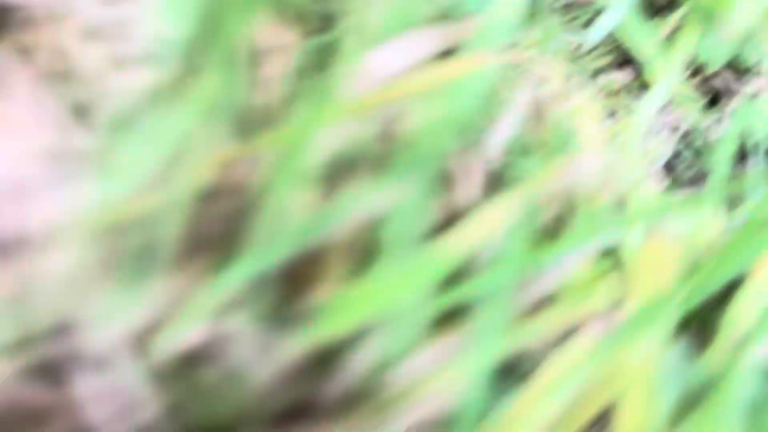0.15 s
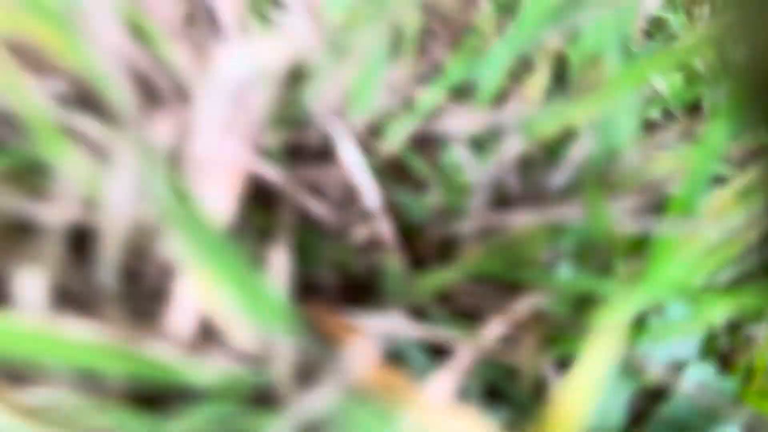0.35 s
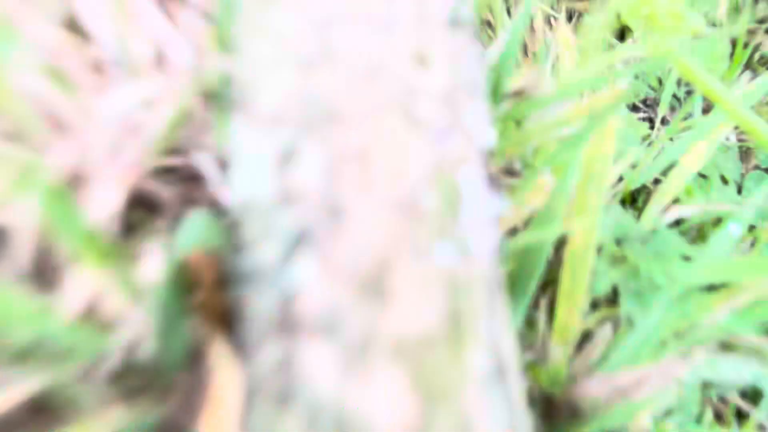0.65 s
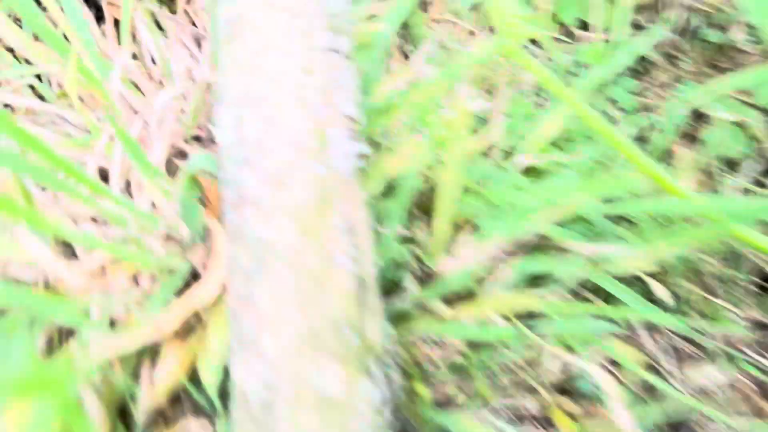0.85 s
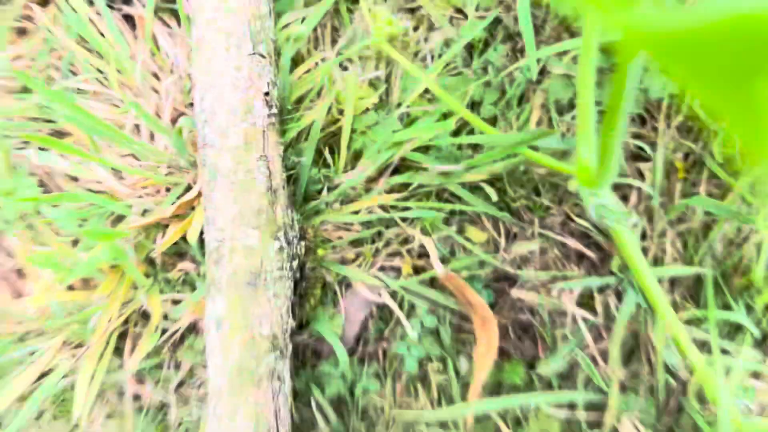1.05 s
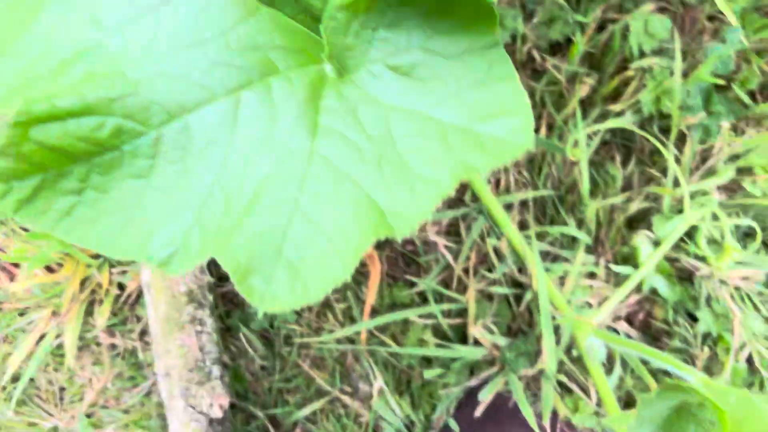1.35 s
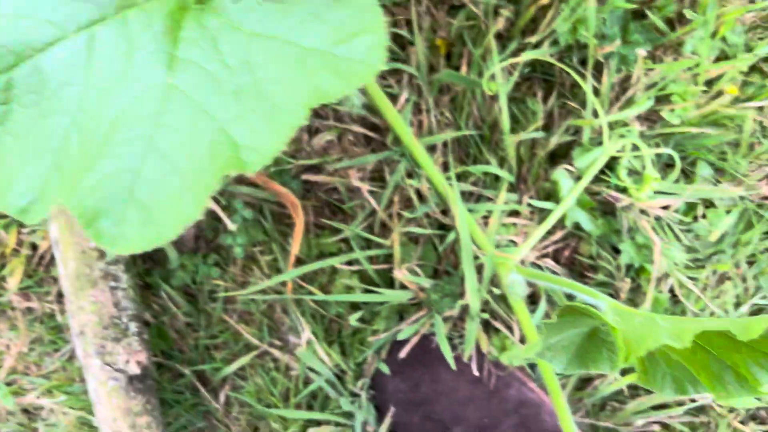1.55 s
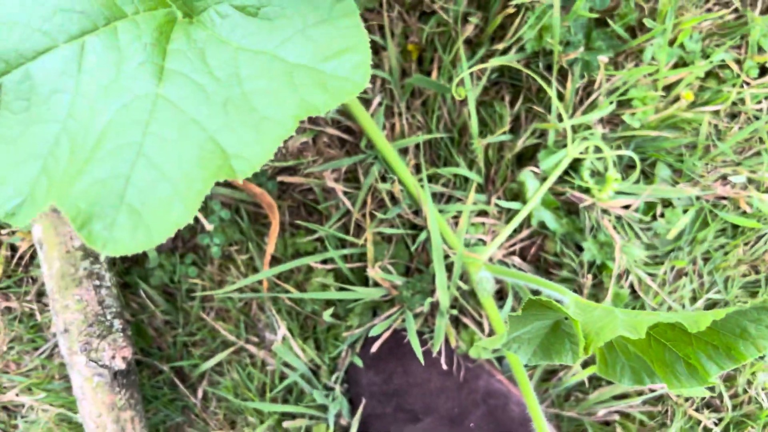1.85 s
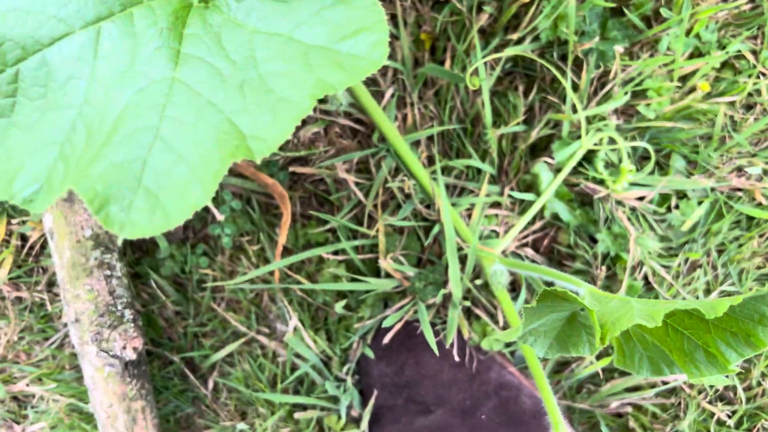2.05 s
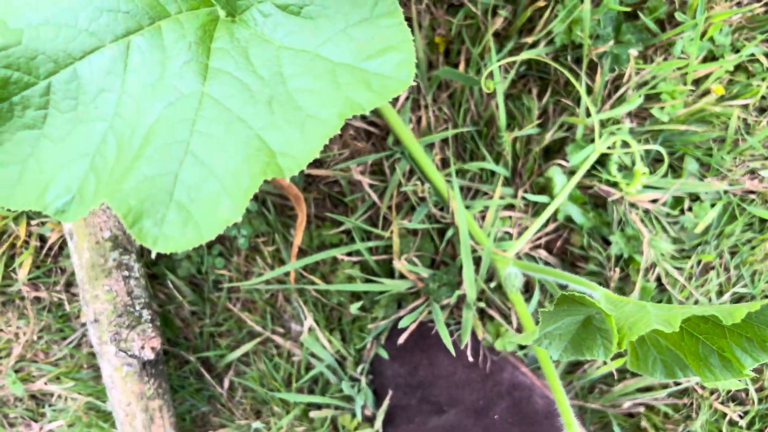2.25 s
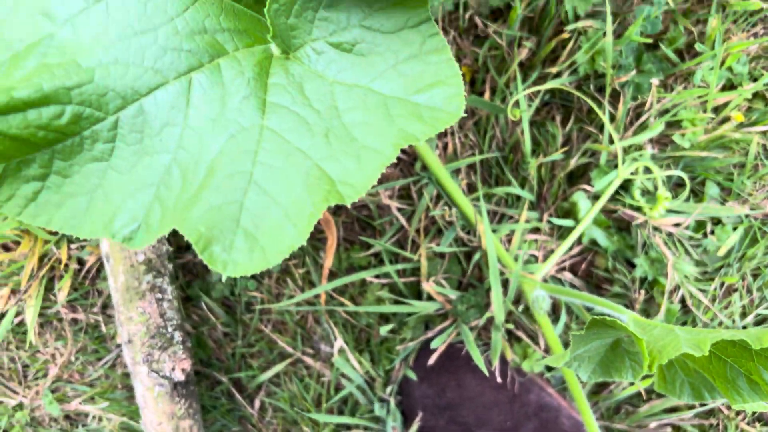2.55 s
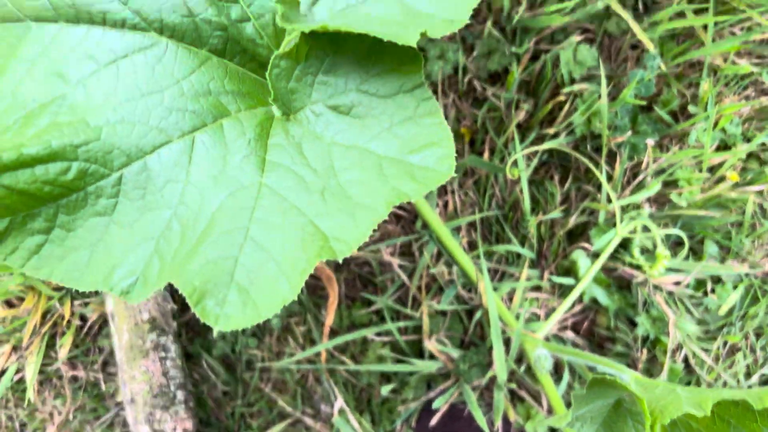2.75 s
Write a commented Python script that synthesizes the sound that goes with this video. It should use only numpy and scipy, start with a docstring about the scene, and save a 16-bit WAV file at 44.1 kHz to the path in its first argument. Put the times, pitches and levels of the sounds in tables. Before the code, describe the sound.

Long grass brushes close past a hand-held microphone over soft, low steps. A stalk gives a short rough creak and a bristly stem rasps. Then the movement nearly stops, and stems tick faintly in a quiet garden.

```python
"""Blades of long grass brush past, right at a hand-held camera carried low among grass and vines.
A stalk sticks and slips on the housing with a short rough creak, then a bristly stem rasps over the
stereo microphone. Steps and handling come through the camera body as soft low thuds. The walker
then stands almost still, and stems tick and crack as the grass settles in the quiet garden."""
import sys
import numpy as np
from scipy import signal
from scipy.fft import rfft, irfft, next_fast_len
from scipy.io import wavfile
from scipy.ndimage import uniform_filter1d, map_coordinates

SR = 44100
rng = np.random.default_rng(int(sys.argv[2]) if len(sys.argv) > 2 else 0)


def to_wav(s):
    """Save 16-bit WAV."""
    ch = np.atleast_2d(s).T  # columns
    pcm = np.round(np.clip(ch, -1, 1) * 32767)  # PCM
    wavfile.write(sys.argv[1], SR, pcm.astype(np.int16))


N = 127890

# How each sound swells and fades. Each row: time in seconds, relative level in dB.
BRUSH_LEVEL = [(0, -54), (.11, -51.5), (.32, -49.5), (.345, -58.5), (.42, -58.5), (.46, -52.5),
               (.53, -50.5), (.56, -66.5), (.81, -65), (.925, -54), (.97, -57.5), (1.08, -59.5),
               (1.13, -57), (1.22, -78.5)]  # leaves passing close by
GRASS_LEVEL = [(1.17, -71), (1.3, -58.5), (1.39, -58.5), (1.46, -64), (1.61, -64), (1.69, -66),
               (1.73, -78.5), (1.9, -87), (1.96, -69.5), (2.08, -84), (2.33, -80.5), (2.51, -71),
               (2.54, -60.5), (2.58, -73), (2.66, -72), (2.68, -62), (2.715, -67), (2.82, -65.5),
               (2.87, -61)]  # grass giving way underfoot
SLIDE_LEVEL = [(.58, -72.5), (.67, -59.5), (.81, -65)]  # one sliding blade
RUB_LEVEL = [(.19, -57), (.23, -35), (.25, -41), (.257, -37), (.2665, -37), (.2695, -24.2), (.312, -24.2),
             (.316, -35), (.335, -54), (.39, -52), (.43, -64)]  # the stalk on the housing
RASP_LEVEL = [(.42, -62), (.478, -47), (.489, -38), (.511, -35.5), (.52, -44), (.535, -49), (.548, -46),
              (.552, -74)]  # bristles on the microphone
RUMBLE_LEVEL = [(0, -45), (.2, -48.5), (.29, -40.5), (.39, -54.5), (.5, -52.5), (.72, -58.5), (.92, -51.5),
                (1.17, -54.5), (1.22, -66), (1.6, -65), (1.8, -80.5), (2.4, -74), (2.9, -70)]  # the moving hand

# The spectrum of each sound. Each row: frequency in Hz, relative level in dB.
BRUSH_SPECTRUM = [(100, -22), (300, 7.5), (550, 5), (1000, 2.5), (2000, 1), (3000, -2), (7500, -7),
                  (15500, -8)]
GRASS_SPECTRUM = [(100, -14), (500, -4), (1700, -2), (2700, -2), (3500, -5), (5000, -6.5), (9000, -15.5),
                  (12000, -11)]
RUB_SPECTRUM = [(150, -22), (300, -13.5), (370, -1), (440, -19), (560, 4.5), (760, 1), (950, -7),
                (1400, -9.5), (1700, -23), (2100, -17.5), (3000, -31), (6500, -31), (11000, -55)]
RASP_SPECTRUM = [(300, -17.5), (2000, -13.5), (6500, -20), (8000, -2.5), (12500, -4.5), (16000, -13.5)]
TICK_SPECTRUM = [(300, -22), (1500, -10), (5000, -19), (7600, -6), (9500, -6), (11500, 0), (13500, -4),
                 (16000, -5)]
RUMBLE_SPECTRUM = [(20, -24), (60, -3), (190, -5.5), (400, -14.5), (3000, -93)]
AIR_SPECTRUM = [(20, -4.5), (100, 15), (170, -0.5), (400, -23.5), (2000, -8.5), (6000, -24.5),
                (15000, -15.5)]

# Sharp ticks close by. Each row: start in seconds, level in dB, seconds to fall 60 dB.
STEM_TICKS = [(.1126, -37.5, .014), (.127, -31.5, .016), (.4918, -26, .014), (.523, -31, .008),
              (.5248, -25, .008), (.5402, -27.5, .006), (.6278, -40, .025), (.6427, -25, .007),
              (.6695, -46, .006), (1.6815, -47, .008), (1.687, -46, .012), (1.7828, -45, .013),
              (1.936, -57, .009), (1.951, -59, .012), (2.1162, -40, .018), (2.176, -57, .035),
              (2.214, -52, .012), (2.4718, -51, .008)]
# Cracks with a pitched note: mostly stalks cracking in the grass, plus a scuff as the stalk meets the housing
# and the broader body of two close ticks during the rasp. Each row: start in seconds, level in dB, pitch in Hz,
# seconds to fall 60 dB.
STALK_CRACKS = [(.2555, -35.5, 700, .016), (.5248, -34, 5800, .008), (.5403, -36, 4700, .007),
                (1.596, -53, 620, .015), (1.656, -54, 1000, .014), (1.682, -53.5, 1000, .012),
                (1.7205, -57, 980, .014), (1.756, -55, 1000, .014), (1.937, -52, 620, .024),
                (2.117, -58, 1300, .026), (2.183, -58.5, 650, .022), (2.223, -55, 3000, .01),
                (2.2325, -48, 640, .017), (2.2808, -47.5, 3400, .012), (2.364, -57.5, 440, .024),
                (2.3635, -54, 5100, .01), (2.472, -54, 1850, .02), (2.538, -55, 700, .015),
                (2.687, -55, 3000, .016)]
# Steps and grip. Each row: start in seconds, level in dB, pitch in Hz, length in seconds.
BODY_THUDS = [(-.03, -36.5, 73.8, 0.07), (0.087, -36, 122.7, 0.073), (0.247, -35, 126, 0.027),
              (0.282, -34.5, 87.6, 0.074), (0.436, -51.5, 113.2, 0.1), (0.606, -52.5, 141, 0.074),
              (0.832, -47.5, 119.4, 0.059), (0.875, -45.5, 75.2, 0.067), (0.992, -54.5, 54.9, 0.26),
              (1.15, -50.5, 71, 0.053), (2.54, -56.5, 129, 0.02), (2.668, -60, 97.5, 0.1)]

# Stereo lean of the stalk and of the microphone. Each row: frequency in Hz, left minus right in dB.
RUB_LEAN = [(150, 1), (700, -4), (6000, -11), (8500, 1)]
MIC_LEAN = [(100, 0), (600, -1), (1800, -4.5), (3000, -2.5), (5500, -6), (7500, -1), (8500, 0)]
# How alike the channels are. Each row: frequency in Hz, likeness from -1 (opposed) to 1 (in step).
MIC_LIKENESS = [(30, 0.98), (200, 0.88), (400, 0.79), (1100, -0.53), (2100, 0.3), (3500, 0)]

BRUSH_DB, GRASS_DB, SQUEAK_DB, RASP_DB, RUMBLE_DB, AIR_DB = 7, 4, -7, 2, 2, -69
CREAK_HZ, CREAK_ROUGH, CREAK_WANDER_RAD, FLUTTER_PER_S = 604, .3, .38, 260
CREAK_DB, CREAK_ONSET_DB, SLIP_DB, SCUFF_DB = -3.8, -44, -4.3, -4.5
SLIPS_PER_S, SLIP_SCATTER, RUB_LAG_S = 170, .22, .00036
CRACK_Q, CRACK_FLOOR, HOUSING_HZ = 1.3, .036, 1830
NOTE_DB, SPLINTER_DB, HOUSING_DB = -5.5, -2.5, -11.5
THUD_ROUGH, THUD_WANDER_RAD, THUD_FLUTTER_PER_S = .35, .8, 110
COMB_FROM_HZ, COMB_PERIOD_HZ, COMB_DEPTH = 6600, 4750, 2.5
LOW_CUT_HZ, TOP_HZ = 48, 15850
LEFT_RIGHT = np.array([[1], [-1]])  # left up, right down


def leaves():
    """Blades brush the camera, one with a thin hiss; grass underfoot crunches and rubs blade on blade."""
    brush = friction(BRUSH_SPECTRUM, per_s=1400, spread_db=3, smooth=1, clump_db=1.5)
    near = amp(BRUSH_DB) * level(BRUSH_LEVEL) * patchy(brush, depth_db=2.5)
    crunch = patchy(friction(GRASS_SPECTRUM, per_s=900, spread_db=3.3, smooth=.9, clump_db=1.1), depth_db=2)
    squeak = amp(SQUEAK_DB) * wandering_band(hz=2250, half_width_hz=220)
    underfoot = amp(GRASS_DB + LEFT_RIGHT) * level(GRASS_LEVEL) * (crunch + squeak)
    slide = stroke(SLIDE_LEVEL) * wandering_band(hz=5700, half_width_hz=1300)
    return near + underfoot + slide


def stalk_rub():
    """A stalk sticks and slips on the housing: a rough creak, uneven slips and scuffing, to the right."""
    t = np.arange(N) / SR
    flutter = 1 + CREAK_ROUGH * wobble(FLUTTER_PER_S)
    creak = unit(flutter * np.sin(2 * np.pi * CREAK_HZ * t + CREAK_WANDER_RAD * wobble(FLUTTER_PER_S)))
    slip_count = np.cumsum(SLIPS_PER_S * np.exp(SLIP_SCATTER * wobble(SLIPS_PER_S))) / SR
    slips = coloured(np.diff(np.floor(slip_count), prepend=0), RUB_SPECTRUM)
    pressure = level(RUB_LEVEL)
    grip = pressure / np.hypot(pressure, amp(CREAK_ONSET_DB))  # a light touch barely creaks
    body = amp(CREAK_DB) * grip * creak + amp(SLIP_DB) * slips
    delayed = filtered(body, lambda hz: np.exp(-2j * np.pi * hz * RUB_LAG_S))
    scuff = amp(SCUFF_DB) * friction(RUB_SPECTRUM, per_s=770, spread_db=2, smooth=1, clump_db=1)
    rub = stroke(RUB_LEVEL) * (np.array([body, delayed]) + scuff)
    return filtered(rub, lambda hz: lean(RUB_LEAN, hz))


def bristles():
    """Stiff hairs of a stem flick directly over the microphone ports."""
    rasp = friction(RASP_SPECTRUM, per_s=2100, spread_db=.5, smooth=.5, clump_db=5.5)
    return amp(RASP_DB) * stroke(RASP_LEVEL) * patchy(rasp, depth_db=0)


def stems():
    """Stems tick close by; stalks crack with a woody note, a splinter of noise and a ring of the housing."""
    out = np.zeros((2, N))
    for start, db, t60 in STEM_TICKS:
        shape = burst(t60)
        add(out, start, amp(db) * shape * coloured(noise(len(shape)), TICK_SPECTRUM))
    for start, db, pitch, t60 in STALK_CRACKS:
        shape = burst(t60)
        n = len(shape)
        resonance = lambda hz: CRACK_FLOOR + 1 / (1 + (CRACK_Q * (hz / pitch - pitch / (hz + 1))) ** 2)
        splinter = amp(SPLINTER_DB) * unit(filtered(noise(n), resonance))
        wood = amp(NOTE_DB) * note(pitch, n)
        housing = amp(HOUSING_DB) * note(HOUSING_HZ, n)
        add(out, start, amp(db) * shape * (wood + splinter + housing))
    return out


def thuds():
    """Steps and handling shake the camera body: a rumble, and swells of an unsteady low note."""
    out = amp(RUMBLE_DB) * level(RUMBLE_LEVEL) * coloured(noise(N), RUMBLE_SPECTRUM)
    t = np.arange(N) / SR
    for start, db, pitch, length in BODY_THUDS:
        swell = np.sin(np.pi * np.clip((t - start) / length, 0, 1)) ** 2
        flutter = 1 + THUD_ROUGH * wobble(THUD_FLUTTER_PER_S)
        phase = 2 * np.pi * pitch * (t - start) + THUD_WANDER_RAD * wobble(THUD_FLUTTER_PER_S)
        out += amp(db) * swell * flutter * unit(np.sin(phase))
    return out


def air():
    """The quiet garden behind it all: a low rumble and faint hiss."""
    return amp(AIR_DB) * coloured(noise(N), AIR_SPECTRUM)


def friction(spectrum, per_s, spread_db, smooth, clump_db):
    """Tiny catches of random size over a smooth hiss, in clumps; each port gets its own noise."""
    catches = (rng.random(N) < per_s / SR) * amp(spread_db * np.minimum(rng.exponential(size=N), 4))
    decay = np.exp(-np.arange(64) / 12)
    power = np.convolve(catches ** 2, decay)[:N]
    grain = np.sqrt(power / (power.mean() + 1e-20) + smooth ** 2)
    return coloured(noise(N) * grain * amp(clump_db * wobble(90)), spectrum)


def patchy(x, depth_db):
    """Each blade has a colour of its own: brief random patches in time and pitch."""
    frames = signal.stft(x, nperseg=256)[2]
    patches = uniform_filter1d(rng.standard_normal(frames.shape[1:]), size=4, axis=0)
    patches = uniform_filter1d(patches, size=6, axis=1)
    return unit(signal.istft(frames * amp(depth_db * unit(patches)), nperseg=256)[1][:, :N])


def wandering_band(hz, half_width_hz, glide=.14):
    """A band of stereo noise whose centre wanders by the share glide."""
    a, b = filtered(rng.standard_normal((2, 2, N)), lambda f: 1 / (1 + (f / half_width_hz) ** 4))
    phase = 2 * np.pi * np.cumsum(hz * np.exp(glide * wobble(16))) / SR
    return unit(a * np.cos(phase) + b * np.sin(phase))


def burst(t60, attack_s=.00028):
    """The envelope of a snap: quick rise, exponential fall."""
    t = np.arange(SR // 10) / SR
    shape = (1 - np.exp(-t / attack_s)) * amp(-60 * t / t60)
    return shape / shape.max()


def note(hz, n):
    """A stereo sine, the right side a sixth of a cycle ahead."""
    return unit(np.sin(2 * np.pi * hz * np.arange(n) / SR + np.array([[0], [np.pi / 3]])))


def noise(n):
    """Stereo white noise."""
    return rng.standard_normal((2, n))


def wobble(per_s):
    """A smooth random curve, per_s knots a second."""
    return map_coordinates(rng.standard_normal(4000), [np.arange(N) * per_s / SR], mode="wrap")


def amp(db):
    """Decibels to gain."""
    return 10 ** (np.asarray(db) / 20)


def unit(x):
    """Scaled to rms 1."""
    return x / np.sqrt(np.mean(x ** 2) + 1e-20)


def along(rows, hz):
    """(Hz, value) rows read on a log axis."""
    freqs, values = np.transpose(rows)
    return np.interp(np.log(hz + 1), np.log(freqs + 1), values)


def lean(rows, hz):
    """Left and right gains from (Hz, left minus right dB) rows."""
    return amp(LEFT_RIGHT * along(rows, hz) / 2)


def level(rows):
    """Gain per sample from (s, dB) rows."""
    times, db = np.transpose(rows)
    return amp(np.interp(np.arange(N) / SR, times, db))


def stroke(rows):
    """Like level, but silent outside the rows."""
    t = np.arange(N) / SR
    return level(rows) * (t >= rows[0][0]) * (t <= rows[-1][0])


def filtered(x, response):
    """x through a frequency response."""
    n = x.shape[-1]
    padded = next_fast_len(n + 4096)
    return irfft(rfft(x, padded) * response(np.fft.rfftfreq(padded, 1 / SR)), padded)[..., :n]


def coloured(x, spectrum):
    """x shaped by a spectrum, at rms 1."""
    return unit(filtered(x, lambda hz: amp(along(spectrum, hz))))


def add(out, start_s, sound):
    """Mixes a sound in at start_s."""
    part = out[:, max(round(start_s * SR), 0):][:, :sound.shape[-1]]
    part += sound[..., :part.shape[-1]]


def likeness(hz):
    """In the treble the channels swing between in step and opposed at even frequency intervals."""
    comb = np.tanh(-COMB_DEPTH * np.cos(2 * np.pi * hz / COMB_PERIOD_HZ))
    return np.clip(np.where(hz > COMB_FROM_HZ, comb, along(MIC_LIKENESS, hz)), -1, 1)


def scene():
    """Everything as it reaches the two ports, low among the leaves."""
    return leaves() + thuds() + stalk_rub() + bristles() + stems() + air()


def record(dry):
    """The microphone favours sum or difference by band, leans right and cuts deep bass and the top."""
    mid = filtered(dry[0] + dry[1], lambda hz: np.sqrt(1 + likeness(hz))) / 2
    side = filtered(dry[0] - dry[1], lambda hz: np.sqrt(1 - likeness(hz))) / 2
    band = lambda hz: hz ** 2 / np.hypot(hz ** 2, LOW_CUT_HZ ** 2) * (hz < TOP_HZ)
    return filtered(np.array([mid + side, mid - side]), lambda hz: lean(MIC_LEAN, hz) * band(hz))


dry = scene()
out = record(dry)
to_wav(out)
```